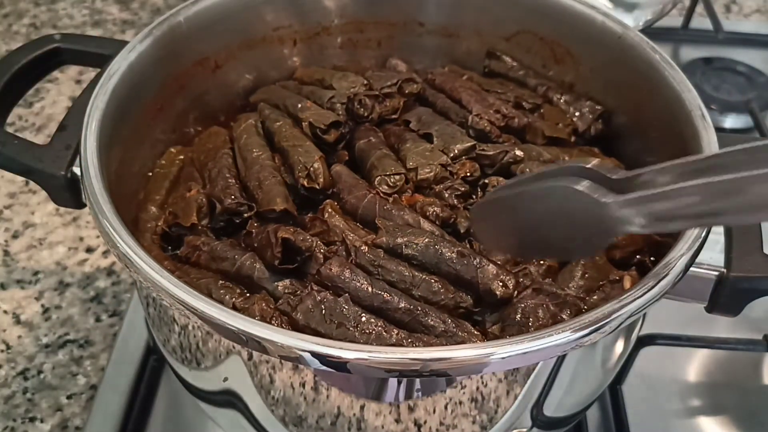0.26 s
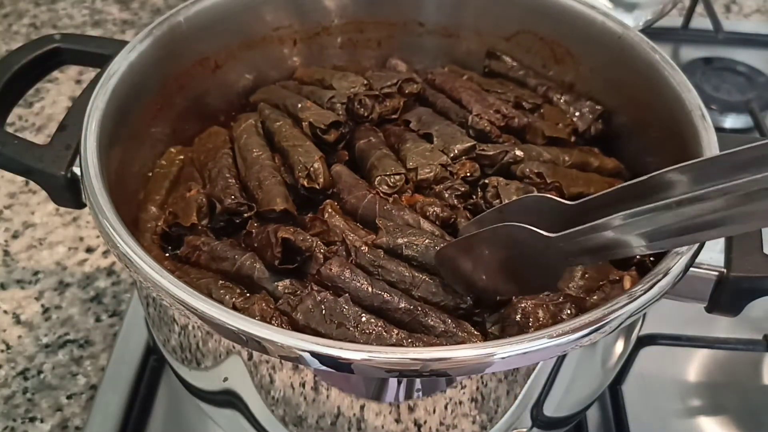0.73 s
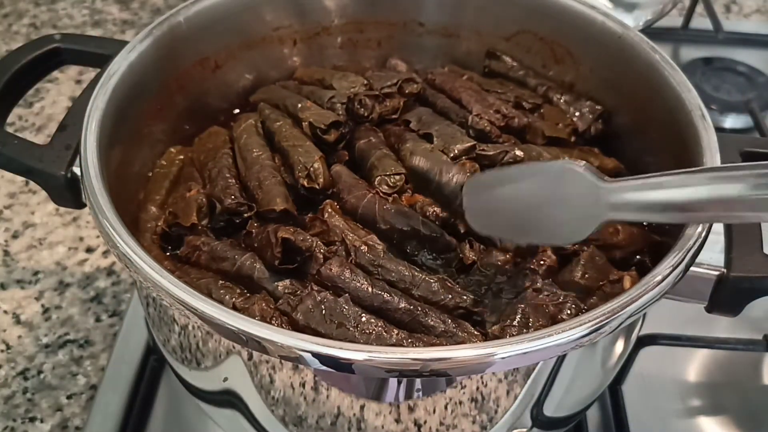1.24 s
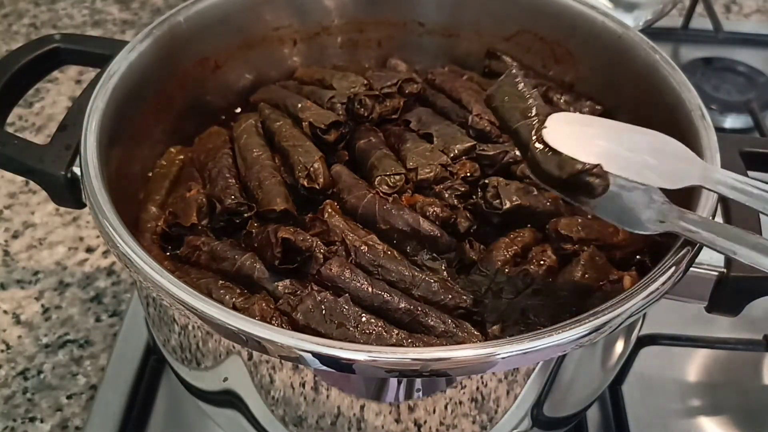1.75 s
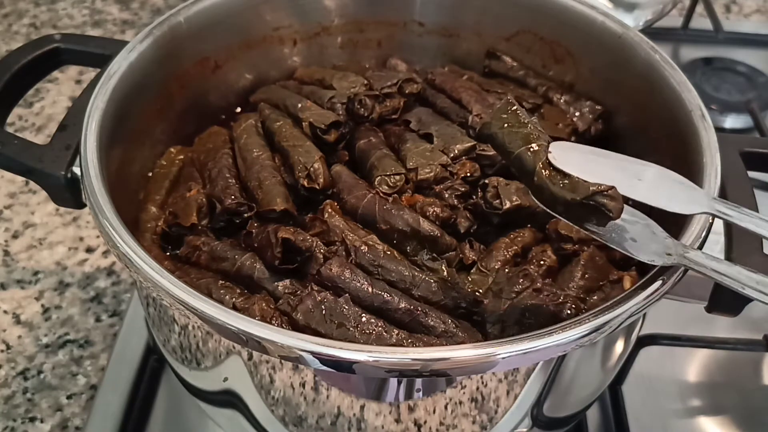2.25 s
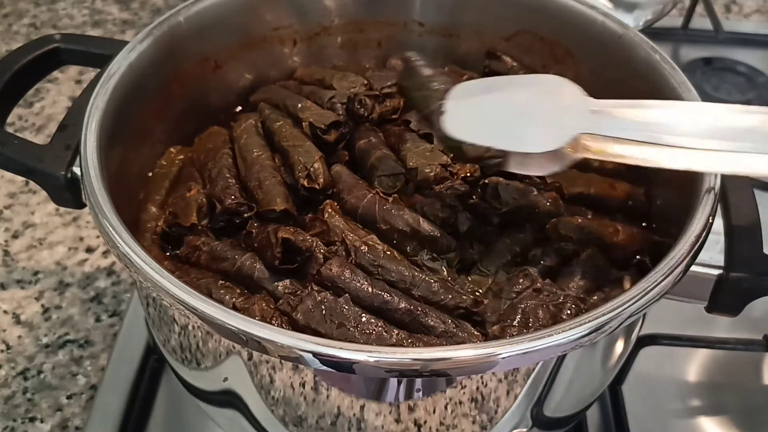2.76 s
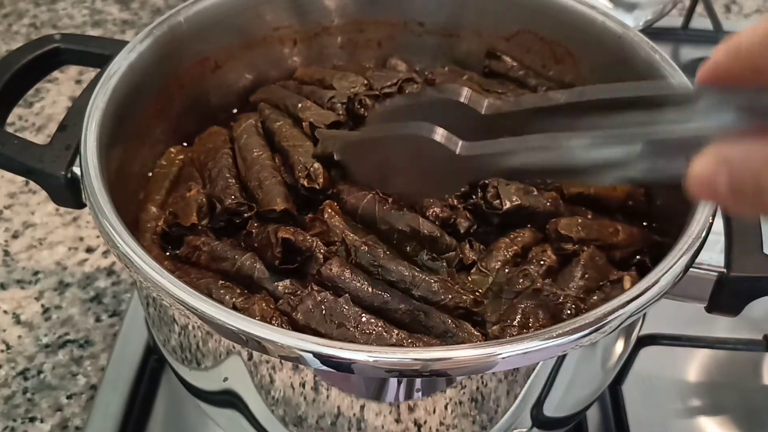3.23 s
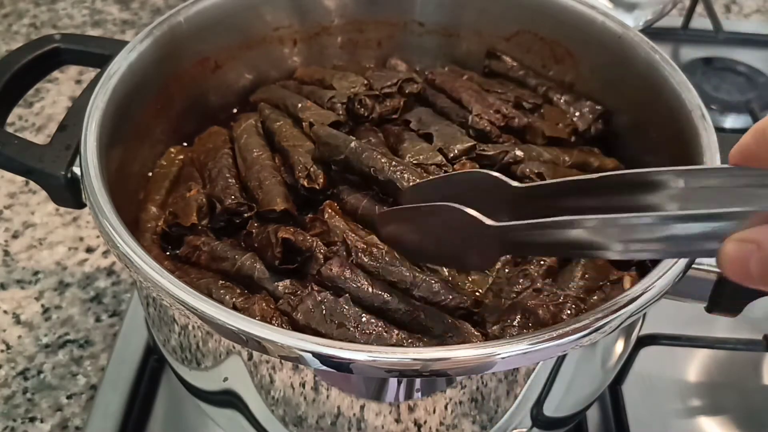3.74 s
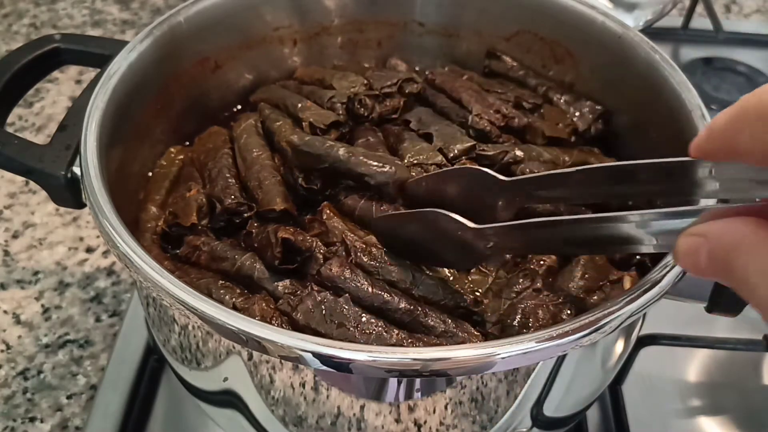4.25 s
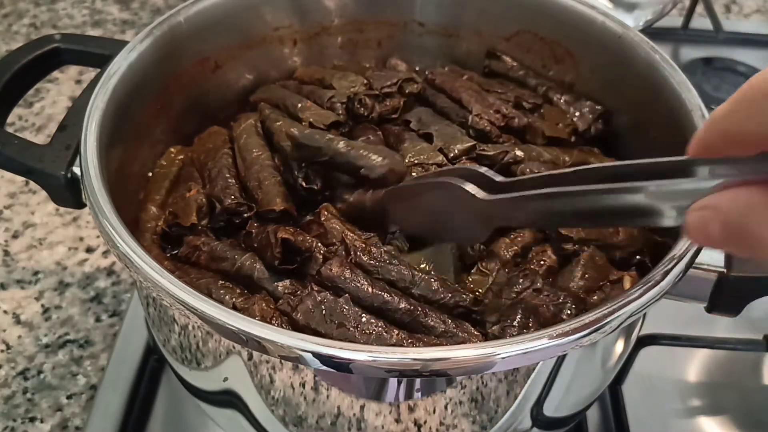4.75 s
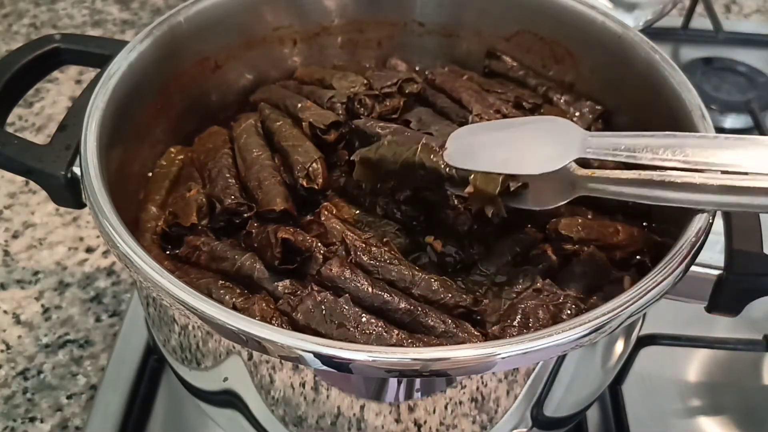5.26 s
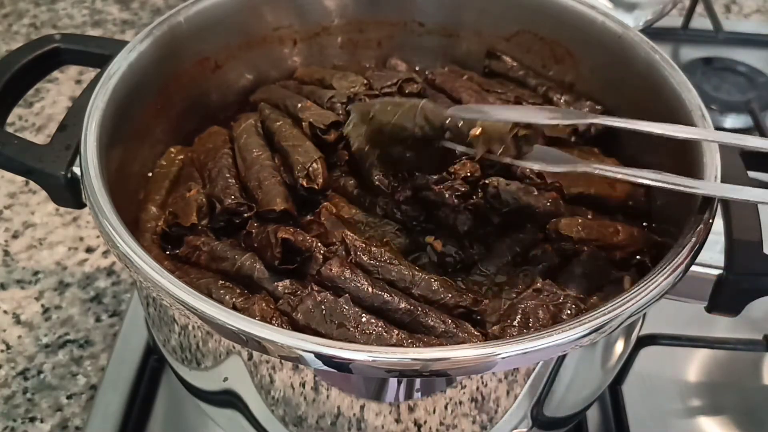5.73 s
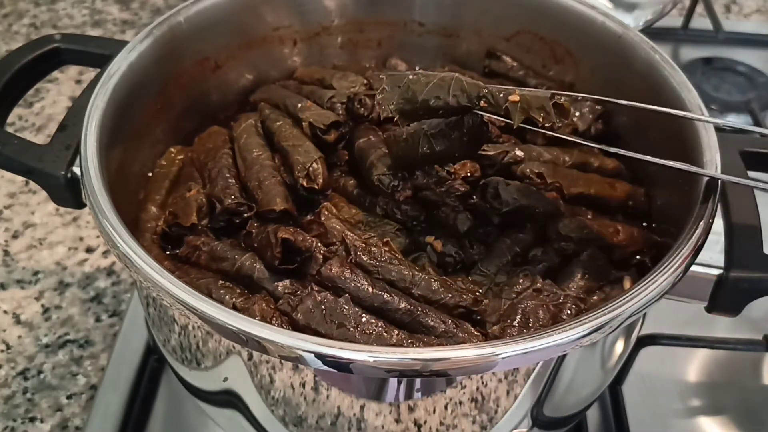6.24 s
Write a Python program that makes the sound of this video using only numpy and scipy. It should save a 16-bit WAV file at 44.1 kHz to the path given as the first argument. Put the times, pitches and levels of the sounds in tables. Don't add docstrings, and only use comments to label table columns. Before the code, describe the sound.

A quiet kitchen with a distant, unsteady compressor hum, fine hiss and faint sleeve rustle. Metal tongs work in a pot of moist food: five dry, bright clacks at irregular gaps, the second clearly strongest, each with a short ring and room echo. Between them come delicate metallic touches, rubbing, buzzing and tiny wet snaps. The close recording's background swells briefly around most clicks.

```python
import sys
import numpy as np
from scipy import signal
from scipy.fft import rfft, irfft
from scipy.io import wavfile

SR = 44100
rng = np.random.default_rng(int(sys.argv[2]) if len(sys.argv) > 2 else 0)


def convert_level_to_amplitude(level_db):
    exponent = np.asarray(level_db, float) / 20
    return 10 ** exponent


def store_pcm(level_fs):
    pcm = np.round(np.clip(level_fs, -1, 1) * 32767).astype(np.int16)
    wavfile.write(sys.argv[1], SR, np.atleast_2d(pcm).T)


N = 286323

# (time [s], peak level [dB], contact length [ms], suppressor opening [dB], held open [s])
CLICK_EVENTS = [
    (1.1469, -31.5, 3, 6.5, 0.068),
    (1.7674, -11.5, 2.44, 6, 0.11),
    (2.7204, -20.5, 3, 6.5, 0.059),
    (5.1701, -22.5, 3.14, 7.5, 0.059),
    (5.7248, -35.5, 2.8, 0, 0.088),
]
# (frequency [Hz], level per Hz [dB])
HISS_COLOUR = [(1290, -36), (2200, -11), (2770, -5.5), (2980, -6.5), (3460, -6), (4080, -1.5), (4500, -2.5),
               (4840, -2.5), (6570, -9), (7800, -3), (8980, -10.5), (11100, -16.5), (14800, -10),
               (15700, -9.5)]


def rms_one(x):
    return x / np.sqrt(np.mean(x ** 2) + 1e-20)


def at_hz(points, hz):
    points = np.array(points)
    return np.interp(np.log(hz + 1), np.log(points[:, 0]), points[:, 1])


def coloured(spectrum):
    hz = np.fft.rfftfreq(N, 1 / SR)
    inside = hz > spectrum[0][0]
    white = rfft(rng.standard_normal(N))
    return rms_one(irfft(white * convert_level_to_amplitude(at_hz(spectrum, hz)) * inside, N))


def drift(rate_hz):
    slow = signal.butter(2, rate_hz, fs=SR, output="sos")
    settled = signal.sosfilt(slow, rng.standard_normal(N + SR))[SR:]
    return rms_one(settled)


def resonate(x, peaks):
    out = 0
    for k, (hz, width, db) in enumerate(peaks):
        r = np.exp(-np.pi * max(width, 5) / SR)
        poles = [1, -2 * r * np.cos(2 * np.pi * hz / SR), r * r]
        zeros = [(1 - r * r) / 2, 0, (r * r - 1) / 2]
        sign = (-1) ** k
        out = out + sign * convert_level_to_amplitude(db) * signal.lfilter(zeros, poles, x)
    return out


def contact(ms, size):
    t = np.arange(size) / SR / (max(ms, .05) / 1000)
    return rng.standard_normal(size) * np.sqrt(t) * np.exp(-t)


def strike(peaks, ms, db, size):
    out = 0
    for hz, width, gain_db in peaks:
        once = [(hz, 1.5 * width, 0)]
        part = resonate(resonate(contact(ms, size), once), once)
        out = out + convert_level_to_amplitude(gain_db) * np.sqrt(max(width, 5)) * rms_one(part)
    return out * convert_level_to_amplitude(db) / np.abs(out).max()


def strokes(rows, hold):
    edge_db = -23
    t, out = np.arange(N) / SR, 0
    for s, db, rise, fall in rows:
        away = np.maximum(np.maximum((s - t) / rise, (t - s - hold) / fall), 0)
        out = out + convert_level_to_amplitude(db + edge_db * np.minimum(away, 1)) * (away < 1)
    return out


def add(out, x, s):
    at = round(s * SR)
    out[at:at + len(x)] += x[:N - at]


def kitchen(size):
    # (frequency [Hz], time [s])
    echo_times = [(1000, 0.51), (4000, 0.27), (8000, 0.33), (12000, 0.18), (16000, 0.24)]
    first_wall_s = 0.0015
    t, out = np.arange(size) / SR, 0
    for low in 400 * 2 ** np.arange(0, 5.4, .5):
        high = min(low * np.sqrt(2), SR * .45)
        band = signal.butter(2, [low, high], "band", fs=SR, output="sos")
        noise = signal.sosfilt(band, rng.standard_normal(size))
        out = out + noise * convert_level_to_amplitude(-60 * t / at_hz(echo_times, low))
    out = out * np.clip(t / first_wall_s - 1, 0, 1)
    return rms_one(out) / np.sqrt(size)


def hum():
    # (multiple of motor speed, rms level [dB])
    motor_tones = [(4.0, -82.5), (6.0, -79), (7.0, -93.5), (8.0, -78.5), (9.0, -68.5), (10.0, -81.5),
                   (11.0, -77.5), (13.0, -84.5)]
    # (multiple of motor speed, rms level [dB])
    rotor_whine = [(59, -96), (60, -91), (61, -94), (80, -93), (152, -94), (153, -90), (154, -92)]
    motor_hz, mains_hum_hz = 49.367, 100.05
    mains_hum_db, second_order_db = -70, -74.5
    beat_silent_s = 3.765
    rumble_hz, rumble_db, sag_hz_per_s = 52.5, -72, .8
    rumble_stop_s, fade_db_per_s = 2.8, 19
    t = np.arange(N) / SR
    turn = 2 * np.pi * (t + .00001 * drift(3.2))
    orders = 0
    for k, db in motor_tones + rotor_whine:
        start = 2 * np.pi * rng.random()
        orders = orders + convert_level_to_amplitude(db) * np.sin(round(k) * motor_hz * turn + start)
    since = turn - 2 * np.pi * beat_silent_s
    mains = convert_level_to_amplitude(mains_hum_db) * np.sin(mains_hum_hz * since)
    second = convert_level_to_amplitude(second_order_db) * np.sin(2 * motor_hz * since)
    fading_db = rumble_db - fade_db_per_s * np.maximum(t - rumble_stop_s, 0)
    rumble = convert_level_to_amplitude(fading_db) * np.sin((rumble_hz - .5 * sag_hz_per_s * t) * turn)
    return np.sqrt(2) * (orders + mains - second + rumble)


def air():
    # (frequency [Hz], level per Hz [dB])
    low_colour = [(15, -43), (25, -15), (69, -10), (81, -19), (102, -3.5), (140, -11.5), (189, -7.5),
                  (364, -11.5), (439, -9.5), (473, -11), (540, -14), (1020, -18), (2200, -26.5),
                  (2860, -66.5), (4840, -120)]
    low_db, high_db = -65, -72.5
    linger_s = 0.054
    after = np.maximum(np.arange(N) / SR - np.array(CLICK_EVENTS)[:, :1], 0) / linger_s
    linger_db = 2.5 * np.sum(after * np.exp(1 - after), axis=0)
    flicker_db = .8 * drift(6)
    low = convert_level_to_amplitude(low_db + 0.87 * linger_db) * coloured(low_colour)
    return low + convert_level_to_amplitude(high_db + linger_db + flicker_db) * coloured(HISS_COLOUR)


def whistles():
    # (frequency [Hz], width [Hz], level [dB])
    fan_peaks = [(2980, 38, -5), (3970, 73, 0.5), (4230, 87, 1), (4720, 61, 3), (4940, 63, -1.5),
                 (7600, 92, -7.5)]
    level_peaks = [(hz, width, 0) for hz, width, _ in fan_peaks]
    once = resonate(rng.standard_normal(N), fan_peaks)
    return convert_level_to_amplitude(-84) * rms_one(resonate(once, level_peaks))


def rustles():
    # (time at full level [s], level [dB], rise [s], fall [s])
    cloth_strokes = [(.02, -77, .1, 0.19), (.9, -79, 0.73, 0.68), (1.45, -73, 0.98, 0.37),
                     (2.1, -70, 0.27, 0.43), (3.05, -76.5, .4, 0.58), (3.75, -76, 0.86, .5),
                     (4.75, -76.5, .4, 0.62), (5.42, -69, 0.52, 0.37), (5.9, -73.5, 0.17, 0.31)]
    uneven = convert_level_to_amplitude(2.0 * drift(25))
    return strokes(cloth_strokes, 0.11) * uneven * coloured(HISS_COLOUR)


def ticks(size=400):
    # (time [s], peak level [dB], pitch [Hz], width [Hz])
    wet_snaps = [(.016, -50, 14500, 3000), (.615, -52.5, 8000, 7000), (.648, -54, 11000, 8000),
                 (.775, -67, 14000, 2500), (1.058, -57, 9000, 9000), (2.954, -59, 14800, 2500),
                 (3.026, -57, 7000, 4000), (3.0915, -55, 15000, 2500), (3.0935, -53, 14500, 2500),
                 (3.0965, -48, 7500, 2500), (3.172, -53, 15000, 3000), (4.062, -61, 14600, 3520),
                 (4.135, -52.5, 8500, 3000), (4.255, -59, 14600, 3000), (4.261, -52, 14000, 3000),
                 (4.275, -57, 14600, 2500), (4.39, -64, 11000, 4000), (4.751, -62, 13600, 1800),
                 (4.768, -60, 12000, 6000), (4.78, -63, 14000, 2000), (4.786, -61, 14000, 2000),
                 (4.82, -59, 14600, 3000), (5.139, -57, 8500, 4000), (5.331, -55, 7460, 3500)]
    out = np.zeros(N)
    for s, db, hz, width in wet_snaps:
        add(out, strike([(hz, width, 0)], 0.35, db, size), s - .0005)
    return out


def hinge():
    # (time at full level [s], level [dB], rise [s], fall [s])
    squeak_strokes = [(.088, -76, .03, .03), (.6, -73, .03, .02), (.86, -76.5, .012, .04)]
    # (time at full level [s], level [dB], rise [s], fall [s])
    drag_strokes = [
        (1.22, -71.5, 0.054, .06),
    ]
    # (time at full level [s], level [dB], rise [s], fall [s])
    buzz_strokes = [(1.988, -59.5, .06, 0.024), (2.038, -60.5, .01, 0.021), (5.85, -66.5, 0.24, 0.027),
                    (5.97, -69, .16, .2)]
    # (frequency [Hz], width [Hz], level [dB])
    pivot_peaks = [(8700, 350, 3), (13200, 400, -6), (14800, 250, 0)]
    rim_peaks = [(8000, 560, 3), (14800, 830, -12)]
    hinge_peaks = [(4620, 170, -0.5), (4980, 250, -3), (6060, 410, -9), (7550, 1100, -12)]
    grains = rng.standard_normal(N) * (rng.random(N) < 2500 / SR)
    squeak = strokes(squeak_strokes, .035) * rms_one(resonate(grains, pivot_peaks))
    drag = strokes(drag_strokes, 0.11) * rms_one(resonate(grains, rim_peaks))
    buzz = strokes(buzz_strokes, .004) * rms_one(resonate(grains, hinge_peaks))
    return squeak + drag + buzz


def tongs(size=SR // 2):
    # (frequency [Hz], width [Hz], level [dB])
    grip_1 = [(517, 300, -7.5), (1160, 200, -8.5), (1640, 400, -8.5), (2720, 1100, -24), (3805, 290, -12),
              (4840, 280, 3), (5630, 600, -11), (6000, 290, -4), (7050, 215, -3.5), (8100, 900, -15.5),
              (10200, 1200, -29), (12740, 500, -30), (14000, 900, -29.5), (15000, 800, -20.5)]
    grip_2 = [(785, 130, -24), (1000, 110, -16.5), (2520, 500, -25), (3200, 250, -13.5), (4060, 240, -12),
              (5044, 190, 0), (5340, 380, -8.5), (6070, 330, -2), (6530, 250, -24), (7200, 860, -14.5),
              (8015, 330, -0.5), (8470, 378, -7.5), (8820, 450, -8), (10440, 600, -21), (11370, 340, -21),
              (11520, 340, -5.5), (12720, 500, -14.5), (13555, 320, -11.5), (14780, 500, -9),
              (14660, 450, -6), (15500, 310, -9), (16530, 740, -13.5)]
    grip_3 = [(1150, 310, -19.5), (1554, 73, -12), (2670, 230, -21), (3100, 370, -16.5), (4320, 280, -14),
              (4630, 390, -15), (5000, 300, 0), (5580, 600, -17), (6080, 210, -7), (6920, 380, -6.5),
              (7730, 340, 1), (8510, 450, -9), (9480, 800, -13.5), (10150, 330, -9), (11170, 500, -19),
              (12560, 900, -14.5), (13600, 450, -7.5), (14580, 450, -3), (15300, 400, -10.5),
              (16100, 750, -15.5)]
    grip_4 = [(1175, 67, -13), (1560, 180, -18), (2680, 190, -16), (3150, 320, -25), (4310, 240, -9),
              (4900, 216, 2), (5600, 310, -19), (6230, 550, -5.5), (6600, 500, -13), (7475, 270, -9),
              (8350, 500, -10.5), (8940, 430, -12), (10900, 500, -20.5), (11700, 510, -17),
              (13410, 600, -13), (14600, 740, -17), (15050, 230, -13.5)]
    grip_5 = [(2500, 530, -19.5), (4170, 350, -10), (4730, 380, -1), (5600, 400, -16), (6120, 220, 4.5),
              (6600, 500, -12), (7980, 490, -4), (8310, 440, -0.5), (9400, 800, -24), (11000, 490, -10),
              (13600, 600, -14), (13500, 310, -14), (15000, 900, -12)]
    # (frequency [Hz], level [dB], time to fall 60 dB [s])
    ring_1 = [(1203, -27.5, 0.16), (4720, -47, 0.21), (5450, -35, 0.16), (7370, -24, 0.21)]
    ring_2 = [(3143, -44.5, 0.23), (4086, -31.5, 0.095), (4650, -42, 0.093), (5018, -39, 0.12),
              (5420, -32, 0.094), (6100, -32, 0.1), (6240, -29, 0.13), (8120, -27.5, 0.1),
              (8250, -41, 0.31), (11480, -51, 0.092)]
    ring_3 = [(1595, -37.5, 0.13), (4600, -39, 0.05), (7100, -36, 0.075), (7540, -36, 0.13)]
    ring_4 = [(1482, -42, 0.15), (5030, -36, 0.09), (4918, -37, 0.081), (6540, -41, .25), (2600, -47, 0.11)]
    ring_5 = [(5000, -28, .2), (6057, -33, .1)]
    # (frequency [Hz], width [Hz], level [dB])
    broad_crack = [(9000, 14200, -44)]
    near_echo_s, near_echo_db = .0115, -15
    room_db = -10
    grips = (grip_1, grip_2, grip_3, grip_4, grip_5)
    rings = (ring_1, ring_2, ring_3, ring_4, ring_5)
    clacks, tails, t = np.zeros(N), np.zeros(N), np.arange(size) / SR
    for (s, db, ms, _, _), grip, modes in zip(CLICK_EVENTS, grips, rings):
        clack = np.pad(strike(grip + broad_crack, ms, db, size=3000), (0, size - 3000))
        ring = 0
        for hz, g, t60 in modes:
            ring = ring + convert_level_to_amplitude(db + g - 60 * t / t60) * np.sin(2 * np.pi * hz * t)
        room = signal.fftconvolve(clack + 2.03 * ring, kitchen(size))[:size]
        add(clacks, clack, s - .0004)
        add(clacks, convert_level_to_amplitude(near_echo_db) * clack, s + near_echo_s)
        add(tails, ring + convert_level_to_amplitude(room_db) * room, s - .0004)
    return clacks, tails


def suppressor():
    at_once = 0.61
    opening_s, closing_s = .11, 0.083
    t, db = np.arange(N) / SR, np.zeros(N)
    for s, _, _, open_db, held in CLICK_EVENTS:
        rise = (t > s) * (at_once + (t - s) / opening_s)
        fall = (s + held + closing_s - t) / closing_s
        db += open_db * np.clip(np.minimum(rise, fall), 0, 1)
    return convert_level_to_amplitude(db)


def touches(size=2000):
    # (time [s], peak level [dB], share above 10 kHz [dB])
    light_touches = [(1.9639, -58, -16), (1.9754, -58, -12), (1.9849, -50.5, -11), (2.0014, -48.5, -16),
                     (2.0354, -51, -10), (2.4932, -49, -19), (2.5036, -45, -12), (2.5117, -47, -13),
                     (2.5254, -55, -23), (5.3597, -55, -26), (5.799, -55.5, 0), (5.9594, -59, -1)]
    # (frequency [Hz], width [Hz], level [dB])
    arm_peaks = [(2550, 290, -14), (3160, 450, -15), (4930, 200, 2), (5480, 250, -5), (6300, 900, -12),
                 (7635, 700, -11), (8375, 230, -4), (8800, 310, -1), (10595, 350, -14), (12500, 900, -19),
                 (13765, 320, -9), (14595, 520, -13), (15295, 350, -12)]
    out = np.zeros(N)
    for s, db, top_db in light_touches:
        peaks = [(hz, width, g + (top_db + 14) * (hz > 1e4)) for hz, width, g in arm_peaks]
        add(out, strike(peaks, 2.5, db - 0.5, size), s - .001)
    return out + convert_level_to_amplitude(-6.5) * signal.fftconvolve(out, kitchen(SR // 2))[:N]


def slides():
    # (time at full level [s], level [dB], rise [s], fall [s])
    slide_strokes = [(2.22, -69, 0.079, .17), (4.466, -62.5, .022, 0.24)]
    # (frequency [Hz], level per Hz [dB])
    rub_colour = [(1180, -26), (2000, -7), (2210, -57), (2450, 0), (4270, 5.5), (6400, -6), (8040, 2),
                  (9920, -17), (12600, -17), (15000, -24)]
    return strokes(slide_strokes, 0.041) * coloured(rub_colour)


def scene():
    soft_top_hz, very_top_db = 15600, -9
    clacks, tails = tongs()
    background = hum() + air() + whistles() + rustles()
    small_sounds = ticks() + hinge() + touches() + slides()
    soft = suppressor() * (tails + background + small_sounds)
    above_hz = np.fft.rfftfreq(N, 1 / SR) - soft_top_hz
    shelf = convert_level_to_amplitude(very_top_db * np.clip(above_hz / 400 + .5, 0, 1))
    return irfft(rfft(soft) * (above_hz < 0) + rfft(clacks) * shelf, N)[None]


def low_pass(x):
    return signal.sosfilt(signal.butter(12, 17000, fs=SR, output="sos"), x)


def record(dry):
    mic_low_hz, top_hz = 42.7, 17400
    cut = signal.sosfilt(signal.butter(4, mic_low_hz, "high", fs=SR, output="sos"), dry)
    cut = signal.sosfilt(signal.cheby2(16, 70, top_hz, fs=SR, output="sos"), cut)
    return low_pass(cut)


dry = scene()
out = record(dry)
store_pcm(out)
```